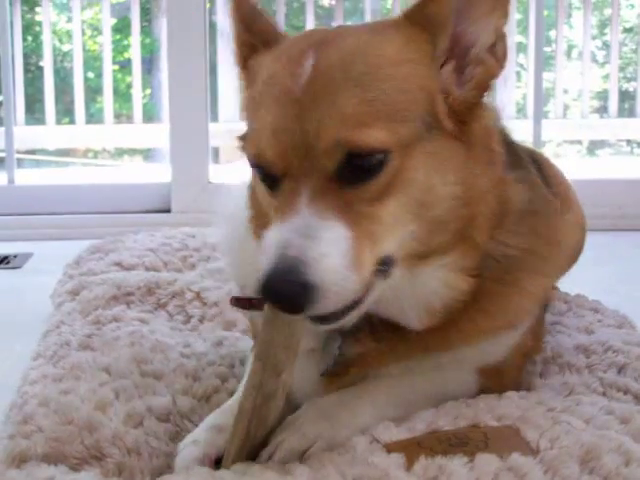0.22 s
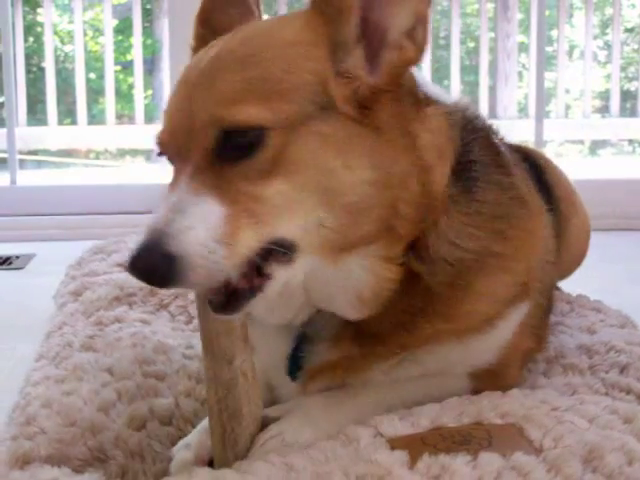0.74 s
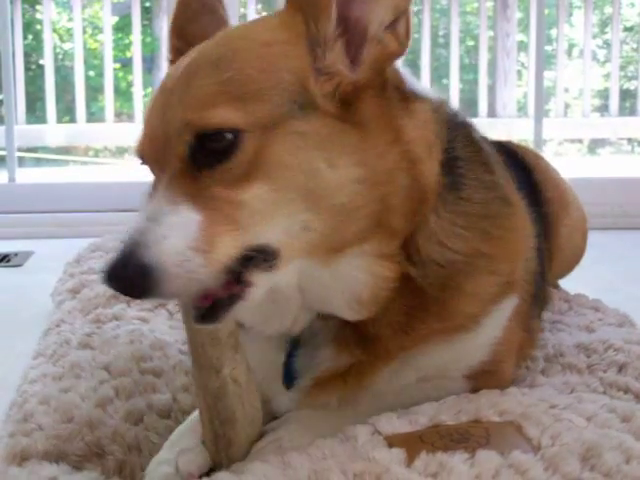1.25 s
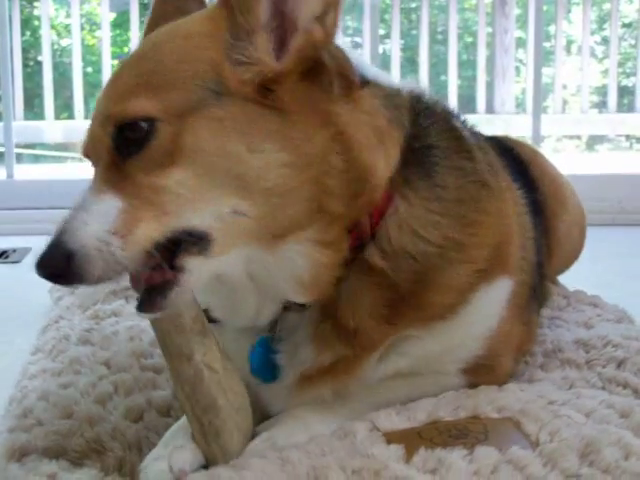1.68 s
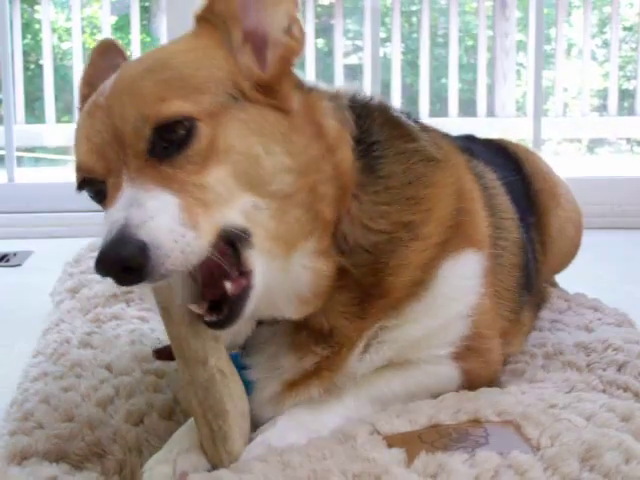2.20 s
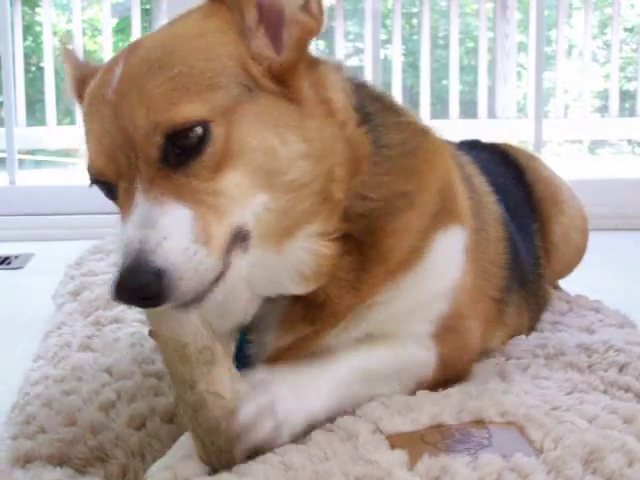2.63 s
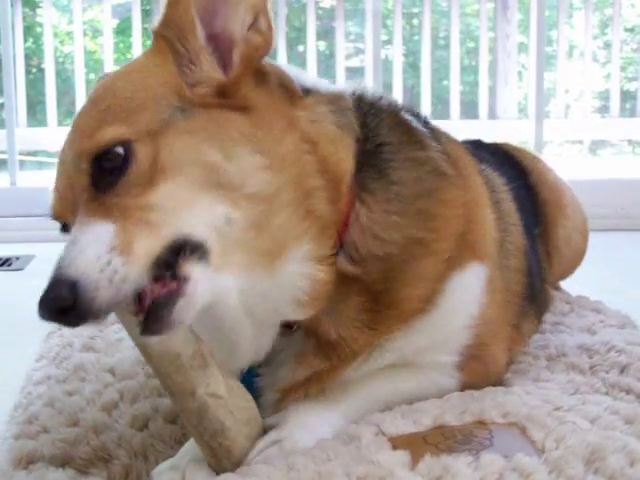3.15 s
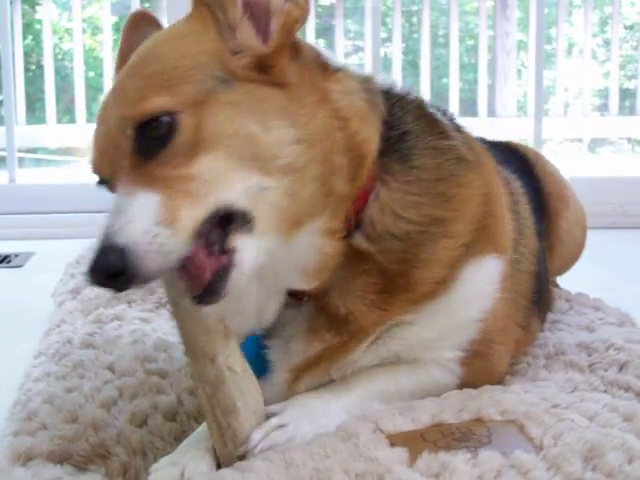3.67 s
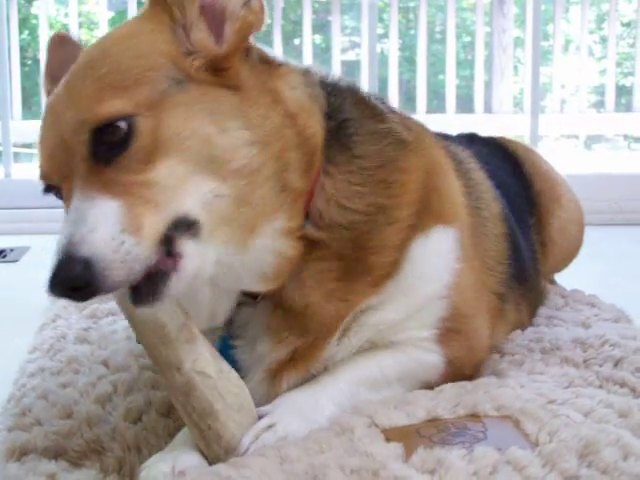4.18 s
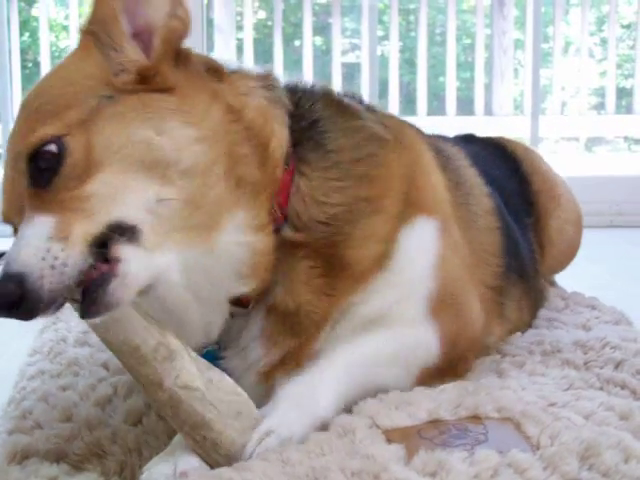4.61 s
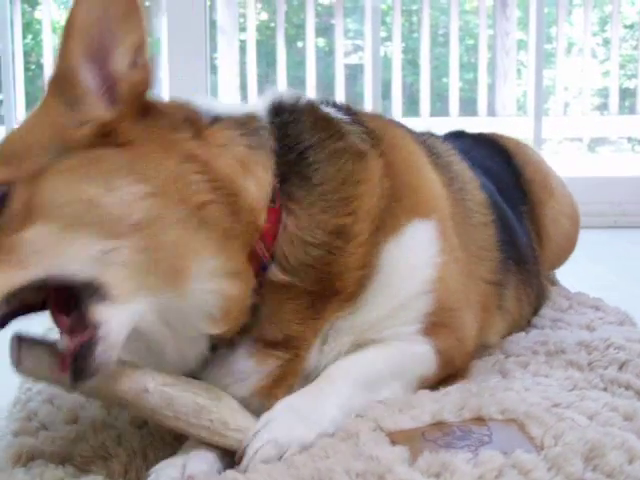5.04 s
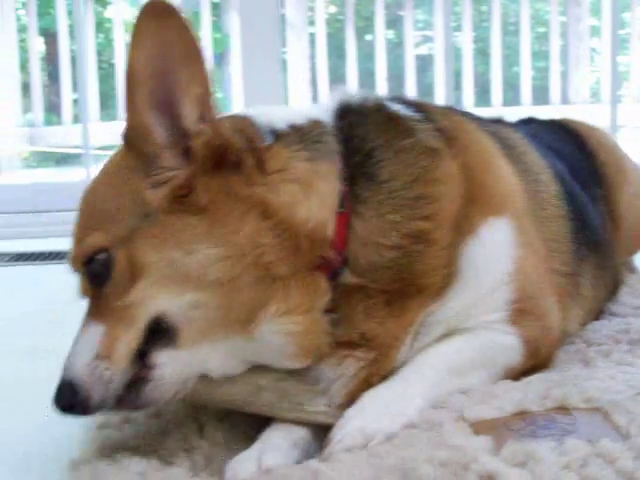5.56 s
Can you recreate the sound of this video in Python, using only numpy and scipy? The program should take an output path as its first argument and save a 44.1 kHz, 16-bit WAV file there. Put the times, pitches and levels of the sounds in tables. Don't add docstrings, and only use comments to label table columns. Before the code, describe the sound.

A dog gnaws a hard antler close up: teeth click, scrape and crunch with dull jaw thuds over faint room hum and thin high whistle.

```python
import sys
import numpy as np
from scipy import signal
from scipy.fft import rfft, irfft
from scipy.io import wavfile
from scipy.ndimage import uniform_filter1d

SR = 44100
rng = np.random.default_rng(int(sys.argv[2]) if len(sys.argv) > 2 else 0)


def master(y):
    cut = np.clip(np.atleast_2d(y).T, -1, 1)
    pcm = np.round(cut * 32767)
    wavfile.write(sys.argv[1], SR, pcm.astype(np.int16))


def gain_from_db(level_db):
    decades = np.asarray(level_db, float) / 20
    return 10 ** decades


N = 257544

# (frequency [Hz], level per hertz [dB])
AIR = [(15, -43), (25, -14.5), (150, -6), (201, -1), (345, -3), (452, -9), (1970, -22), (2390, -22),
       (2640, -23.5), (3370, -18), (3810, -18.5), (4310, -15), (4640, -25.5), (6230, -21), (8780, -37),
       (11400, -81.5), (19300, -120)]
# (frequency [Hz], width [Hz], rms level [dB])
HUM = [(121, 19.6, -51.5), (155, 10.7, -49.5), (356.9, 13.6, -51.5)]
# (frequency [Hz], width [Hz], rms level [dB])
WHISTLES = [(3208, 25, -63), (3483, 30, -63), (4060, 60, -62), (4166, 16, -54.5), (4227, 9, -52.5),
            (4283, 25, -56), (4368, 25, -53.5), (4450, 50, -61), (4988, 25, -67), (6150, 100, -67)]
# (hardest pressure [s], release [s], grind level [dB], jaw rumble level [dB])
STROKES = [(.022, 0.04, -45.5, -29), (0.069, .07, -41.5, -23.5), (0.148, 0.04, -34.5, -30),
           (0.57, 0.025, -30, -21.5), (0.614, 0.075, -36, -31.5), (0.65, 0.028, -25, -58),
           (.775, 0.048, -42, -33.5), (.982, 0.071, -38.5, -62), (1.547, .03, -36, -23.5),
           (1.048, .03, -36.5, -15.5), (1.088, .09, -35.5, -15.5), (1.216, 0.049, -45, -25),
           (1.513, .03, -30, -15), (2.403, 0.04, -36, -15), (2.453, 0.028, -34, -18.5),
           (2.508, 0.055, -36.5, -22), (2.597, 0.067, -42.5, -16.5), (2.68, 0.099, -38.5, -49.5),
           (3.236, .04, -40.5, -57), (3.327, .018, -27.5, -50), (3.594, .032, -31.5, -56),
           (4.002, 0.06, -31, -14.5), (4.051, 0.017, -36.5, -22.5), (4.094, .045, -35, -19),
           (4.198, 0.058, -42.5, -27), (4.544, 0.055, -30, -19.5), (4.612, 0.026, -32, -20.5),
           (4.67, 0.049, -37.5, -42), (4.708, 0.027, -33.5, -30), (5.124, 0.024, -37.5, -28)]
# (frequency [Hz], level [dB])
GRIT = [(260, -44.5), (450, -9), (768, -21.5), (3130, -5), (3410, -15.5), (3960, -14.5), (5680, -15.5),
        (7380, -13.5), (8780, -28), (11400, -72), (19300, -120)]
# (frequency [Hz], width [Hz], level [dB])
JAW = [(139, 52, -4.5), (202.6, 45, 2), (297.2, 58.4, 2.5), (336, 38.5, -9)]
# (frequency [Hz], t60 [s])
ROOM_DECAY = [(200, 0.34), (800, 0.4), (2000, 0.52), (4000, 0.11), (8000, 0.014)]
# (time [s], peak level [dB], pitch [Hz], t60 [s])
THUDS = [(0.025, -23.5, 304, 0.1), (0.073, -22, 130, 0.07), (0.114, -3, 275, 0.017),
         (0.146, -9, 248, 0.031), (0.464, -14.5, 336, 0.048), (0.571, -23, 336, 0.14),
         (0.603, -21, 319, 0.11), (1.04, -14.5, 322, 0.08), (1.064, -11.5, 311, 0.061),
         (1.09, -6, 196, 0.039), (1.144, -15.5, 180, 0.055), (1.206, -22.5, 337, 0.075),
         (1.483, -18.5, 269.6, 0.14), (1.503, -11, 246, 0.034), (1.536, -17.5, 315, 0.092),
         (1.553, -22, 245, 0.1), (2.445, -22, 260, 0.12), (2.507, -3, 301, 0.042),
         (2.591, -12.5, 283, 0.048), (2.958, -22.5, 216, 0.066), (3.973, -20.5, 206, 0.08),
         (3.992, -18, 228, 0.12), (4.03, -16.5, 240, 0.084), (4.044, -21.5, 327, 0.11),
         (4.085, -14, 212.4, 0.12), (4.177, -21, 327, 0.06), (4.538, -17, 275, 0.083),
         (4.569, -10.5, 206, 0.039), (4.606, -19, 236, 0.069), (4.657, -10, 207, 0.038)]
# (time [s], bone level [dB], tooth level [dB], contact place [-1 blunt to 1 sharp edge])
CRUNCH = [(.0473, -46, -39, -1.1), (.0665, -41, -31.5, -1.1), (.1152, -28, -27, 0.29),
          (.1484, -29, -35.5, 0.43), (.5692, -31, -29, 0.18), (.5964, -41, -26, 0.2),
          (1.043, -35, -20, -0.34), (1.0685, -22.5, -31, 0.21), (1.0964, -29, -25.5, -0.36),
          (1.1449, -30, -29, 0), (1.5128, -26, -19.5, 0.11), (2.375, -34.5, -33.5, -.9),
          (2.397, -27, -18.5, -0.45), (2.4204, -32, -33, -0.98), (2.4434, -31.5, -24, -.1),
          (2.5052, -21, -23.5, 0.088), (2.5632, -55, -23.5, 0.32), (2.5888, -37, -30.5, -0.24),
          (3.975, -44, -28, -0.49), (4.0028, -35, -19.5, -0.41), (4.045, -30, -32, -0.062),
          (4.5266, -18, -30, -1.1), (4.6059, -40, -25, -0.64), (4.6563, -45, -33, .55),
          (4.7035, -39, -38.5, 0.64)]
# (time [s], bone level [dB], tooth level [dB], #
MORE_CONTACTS = [(.231, -38, -41, -.1), (0.4719, -19, -27, -1), (0.5519, -21.5, -24, -1.1), (0.7709, -26, -39, -.6),
                 (0.9527, -36, -18.5, -0.29), (1.8372, -17.5, -30, -0.64), (2.1518, -18, -30, 0.28),
                 (2.208, -30, -32, -0.6), (2.5124, -11.5, -26, -0.53), (2.7524, -26, -40, -0.89),
                 (2.9477, -7.5, -12.5, -0.49), (2.9564, -39, -32.5, 0.38), (3.1301, -23.5, -31.5, -1),
                 (3.418, -39, -27, -0.56), (3.581, -48, -28, 0), (3.7862, -13, -26, 0.28), (3.895, -46, -30, -0.5),
                 (4.1984, -20.5, -36.5, -0.9), (4.3237, -36.5, -37, -.7), (4.5098, -19.5, -28, -0.86),
                 (4.7979, -44, -24.5, 0.47), (5.1219, -27, -22.5, 0.28)]
# (lowest [Hz], highest [Hz], t60 [s], level [dB])
PARTS = [(1154, 1900, 0.0085, 0.5), (603, 1200, 0.03, 4.5), (2520, 3100, 0.02, 1.5),
         (3800, 4600, 0.025, -1.5), (5650, 8020, 0.01, 9)]
# (time [s], peak level [dB], pitch [Hz], t60 [s])
PINGS = [(0.077, -28.5, 4400, 0.075), (0.1141, -22, 2580, 0.021), (0.4752, -23.5, 1970, 0.017),
         (0.955, -15, 4040, 0.028), (1.988, -25.5, 5550, 0.0077), (2.252, -31.5, 3080, 0.048),
         (2.452, -27, 3800, 0.067), (2.813, -31, 3120, 0.017), (3.131, -23, 2450, 0.014),
         (3.308, -32, 3030, 0.028), (3.4191, -10, 4050, 0.012), (3.6592, -19.5, 4580, 0.013),
         (4.704, -22.5, 3620, 0.019), (4.7975, -17, 4270, 0.036), (5.046, -24, 3000, .005),
         (5.112, -24.5, 6500, 0.0071), (4.044, -21, 4200, 0.014), (3.327, -25, 3800, .03),
         (5.245, -39.5, 3020, 0.075), (5.302, -34.5, 5000, .04), (5.301, -35, 3060, 0.054),
         (5.37, -34, 2450, 0.017), (5.6416, -33.5, 2900, 0.027)]
# (time [s], peak level [dB], pitch [Hz], t60 [s])
PONGS = [
    (.574, -25, 250, .1),
    (.59, -28.5, 121.6, .13),
    (2.5117, -14.5, 377, .04),
    (2.512, -24.5, 1100, .047),
    (2.767, -36, 1395, .06),
    (3.146, -33, 1360, .037),
    (4.0, -17, 397, .08),
    (4.51, -28.5, 976, .053),
    (5.123, -27, 620, .042),
    (5.126, -31, 850, .04),
]
# (time [s], level [dB])
KNOCKS = [
    (1.835, -37),
    (2.153, -44),
    (2.513, -45),
    (2.948, -27),
    (3.786, -33.5),
    (4.198, -47),
]
# (frequency [Hz], level [dB], t60 [s])
ANTLER = [(657, -11, .25), (880, -13, .15), (1100, -14, .15), (1459, -14, .12), (1635, -8, .2),
          (1749, -6, .22), (1815, -10, .15), (1779, 1.5, .36), (1860, -10, .12), (3079, -8, .05)]
# (frequency [Hz], level [dB])
LOW_CUT = [(50, -29.5), (90, -3), (140, -2.5), (500, -3)]
# (frequency [Hz], level [dB])
MIC = [(100, 1.5), (5000, 1), (6800, -2.5), (7800, -8.5), (8800, -16.5)]

AIR_DB, ROOM_DB = -39.5, -21
STEADY = 1.1
NARROW_HZ = 20
ATTACK_SHARE = 0.78
GRIND_ENDS_DB, RUMBLE_ENDS_DB = (-12.5, -17), (-15.5, -15)
OPEN_DB, SHUT_PER_DB = 1.5, 0.36
MOUTH_HZ, MOUTH_DROP_HZ = 4160, 800
BASE_DB, BONE_TIP_DB = -15.5, -16.5
TIP_PLACE, ENAMEL_PLACE, EDGE_PLACE = -1.2, 0.01, 1.0
TOOTH_FOCUS_DB = 22
CRUMBS_DB, CRUMBS_T60_S, CRUMBS_PER_S = -13, 0.06, 600


def evened(x):
    return x / np.sqrt(np.mean(x ** 2) + 1e-20)


def read(points, hz):
    f, value = np.transpose(points)
    return np.interp(np.log(hz + 1), np.log(f + 1), value)


def coloured(x, points):
    gain = gain_from_db(read(points, np.fft.rfftfreq(len(x), 1 / SR)))
    return irfft(rfft(x) * gain, len(x))


def add(mix, s, sound):
    part = mix[round(s * SR):][:len(sound)]
    part += sound[:len(part)]


def resonate(x, hz, width):
    turn = np.exp(2j * np.pi * np.cumsum(hz * np.ones(len(x))) / SR)
    r = np.exp(-np.pi * width / SR)
    return 2 * (turn * signal.lfilter([1 - r], [1, -r], x / turn)).real


def struck(hz, t60, t):
    return np.sin(2 * np.pi * hz * t) * gain_from_db(-60 * t / np.maximum(t60, 1e-3))


def air():
    frames = N // 256 + 5
    a, b, patches = rng.standard_normal((frames, 513, 3)).T
    patches = uniform_filter1d(uniform_filter1d(patches, 10, 0), 12, 1)
    spectrum = (a + 1j * b) * gain_from_db(1.58 * evened(patches))
    noise = signal.istft(spectrum, nperseg=1024, noverlap=768)[1][:N]
    return gain_from_db(AIR_DB - 3.5) * evened(coloured(noise, AIR))


def tones():
    t = np.arange(N) / SR
    out = gain_from_db(-52.0) * np.sin(2 * np.pi * 59.6 * t)
    for hz, width, db in HUM + WHISTLES:
        noise = rng.standard_normal(N)
        wavering = evened(resonate(resonate(noise, hz, width), hz, 2 * width))
        core = STEADY * np.sin(2 * np.pi * hz * t) * (width < NARROW_HZ)
        out += gain_from_db(db) * evened(core + wavering)
    return out


def grinding():
    out = np.zeros(N)
    draw, size, sign = rng.random(N), rng.exponential(1, N), rng.standard_normal(N)
    clumps = evened(uniform_filter1d(rng.standard_normal(N), 180))
    slips = (draw < 2500 / SR) * sign * gain_from_db(0.72 * np.minimum(size, 4) + 2.5 * clumps)
    grit = evened(coloured(evened(slips), GRIT))
    shakes = (draw > 1 - 250 / SR) * sign
    rumble = evened(sum(gain_from_db(db) * resonate(resonate(shakes, hz, w), hz, 2 * w) for hz, w, db in JAW))
    for peak_s, release_s, grind_db, rumble_db in STROKES:
        s = np.array([peak_s - ATTACK_SHARE * release_s, peak_s, peak_s + release_s])
        at = np.arange(max(round(s[0] * SR), 0), round(s[-1] * SR))

        def swell(start, peak, end):
            return np.interp(at / SR, s, [start, peak, end])

        grind = gain_from_db(grind_db + swell(GRIND_ENDS_DB[0], 0, GRIND_ENDS_DB[1]))
        shake = gain_from_db(rumble_db + swell(RUMBLE_ENDS_DB[0], 0, RUMBLE_ENDS_DB[1]))
        mouth = gain_from_db(OPEN_DB - SHUT_PER_DB * (rumble_db - grind_db))
        mouth_hz = MOUTH_HZ - MOUTH_DROP_HZ / (1 + mouth) * swell(0, 1, 0)
        rub = 0.5 * grit[at] + sign[at]
        cavity = evened(resonate(resonate(rub, mouth_hz, 1250), mouth_hz, 1250))
        teeth = grind * evened(grit[at] + mouth * cavity)
        jaw = shake * gain_from_db(-8.5) * evened(rumble[at])
        out[at] += signal.windows.tukey(len(at), min(1, 600 / len(at))) * (teeth + jaw)
    return out


def room(x):
    taps = np.zeros(SR // 2)
    at = np.arange(130, len(taps) - 20, 20)
    taps[at + rng.integers(0, 20, len(at))] = rng.choice([-1., 1.], len(at))
    hz, t, z = signal.stft(taps, SR, nperseg=128)
    t60 = np.maximum(read(ROOM_DECAY, hz), 0.02)[:, None]
    tail = signal.istft(z * gain_from_db(-60 * t / t60), SR, nperseg=128)[1]
    return signal.fftconvolve(x, tail / np.linalg.norm(tail))[:N]


def thuds():
    t, out = np.arange(SR // 5) / SR, np.zeros(N)
    swell = np.sin(np.pi / 2 * np.minimum(t / 0.0069, 1)) ** 2
    for s, db, hz, t60 in THUDS:
        blow = struck(hz * (1 + 0.16 * np.exp(-t / 0.0035)), t60, t)
        blow += 0.34 * struck(1.372 * hz, 0.49 * t60, t)
        add(out, s, gain_from_db(db) * blow * swell)
    return out


def ticks():
    t, out = np.arange(SR // 16) / SR, np.zeros(N)
    rise = np.sin(np.pi / 2 * np.minimum(t / 0.00072, 1)) ** 2
    tooth_places = np.array([TIP_PLACE, ENAMEL_PLACE, EDGE_PLACE])
    for s, bone_db, tooth_db, contact in CRUNCH + MORE_CONTACTS:
        tip, enamel, edge = gain_from_db(tooth_db - TOOTH_FOCUS_DB * (contact - tooth_places) ** 2)
        bone = gain_from_db(bone_db)
        any_tip = np.hypot(tip, bone * gain_from_db(BONE_TIP_DB))
        gains = bone, bone * gain_from_db(BASE_DB), any_tip, enamel, edge
        for gain, (low_hz, high_hz, t60, part_db) in zip(gains, PARTS):
            spread = (np.arange(4) + rng.random(4)) / 4
            hz = low_hz + (high_hz - low_hz) * spread[:, None]
            add(out, s, gain * gain_from_db(part_db - 1.5) * rise * struck(hz, t60, t).sum(0))
    return out


def crumbs(x):
    t = np.arange(SR // 10) / SR
    grains = (rng.random(len(t)) < CRUMBS_PER_S / SR) * rng.standard_normal(len(t))
    trail = grains * gain_from_db(-60 * t / CRUMBS_T60_S) * (t > 0.003)
    return gain_from_db(CRUMBS_DB) * signal.fftconvolve(x, trail / np.linalg.norm(trail))[:N]


def pings():
    t, out = np.arange(SR // 8) / SR, np.zeros(N)
    for s, db, hz, t60 in PINGS + PONGS:
        ping = struck(hz, t60, t)
        ping += 0.14 * struck(0.45 * hz, 0.23 * t60, t) + 0.15 * struck(0.99 * hz, 0.23 * t60, t)
        add(out, s, gain_from_db(db) * ping * np.minimum(t / 0.00035, 1))
    return out


def ringing():
    t, out = np.arange(SR // 2) / SR, np.zeros(N)
    ring = sum(gain_from_db(db) * struck(hz, t60, t) for hz, db, t60 in ANTLER) * np.minimum(t / 0.006, 1)
    for s, db in KNOCKS:
        add(out, s, gain_from_db(db) * ring)
    return out


def scene():
    background = air() + tones()
    knocks = ticks() + pings()
    dog = coloured(grinding() + thuds() + knocks + ringing(), LOW_CUT)
    echo = gain_from_db(ROOM_DB) * room(knocks + 0.5 * dog)
    return (background + dog + echo + crumbs(knocks))[None]


def roll_off(x):
    return signal.sosfilt(signal.butter(12, 8930, fs=SR, output="sos"), x)


def record(dry):
    dull = coloured(dry[0], MIC + [(9300, -65.5)])[None]
    return roll_off(dull)


dry = scene()
out = record(dry)
master(out)
```